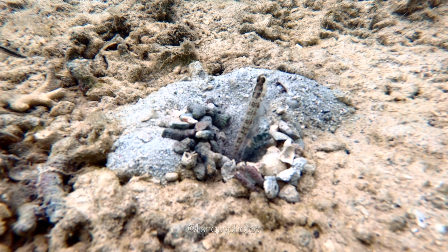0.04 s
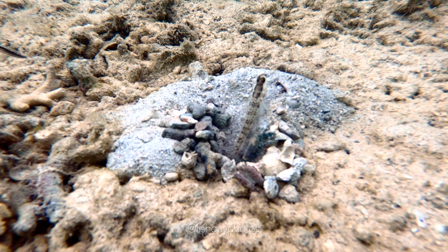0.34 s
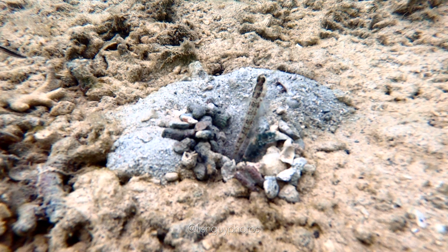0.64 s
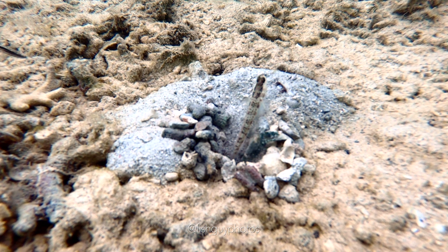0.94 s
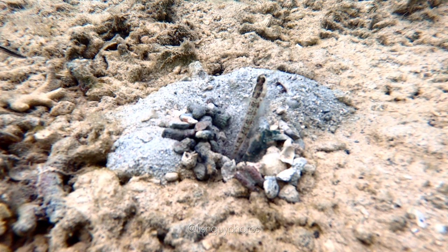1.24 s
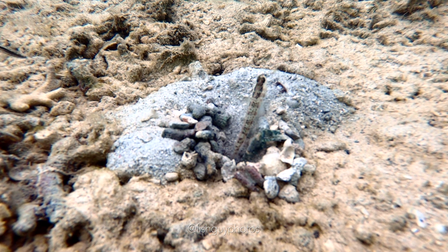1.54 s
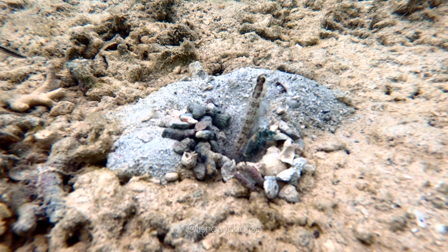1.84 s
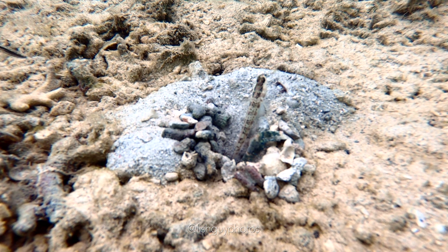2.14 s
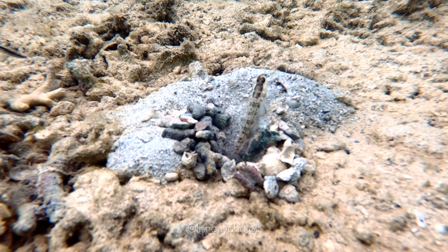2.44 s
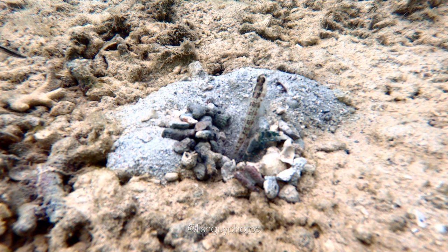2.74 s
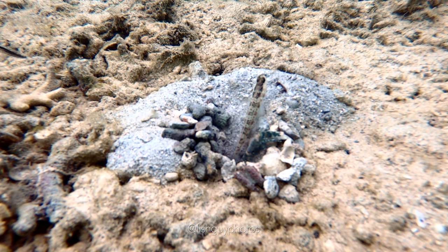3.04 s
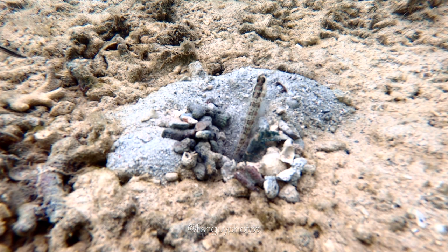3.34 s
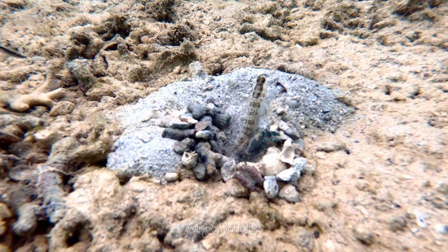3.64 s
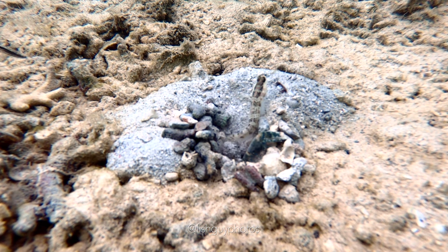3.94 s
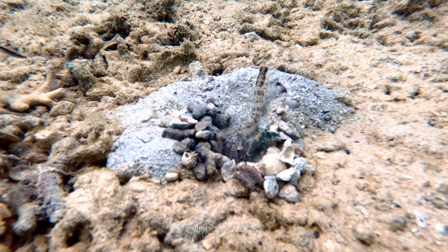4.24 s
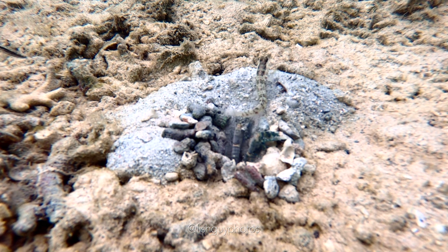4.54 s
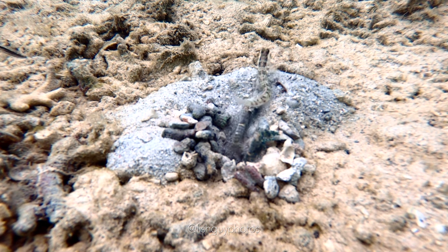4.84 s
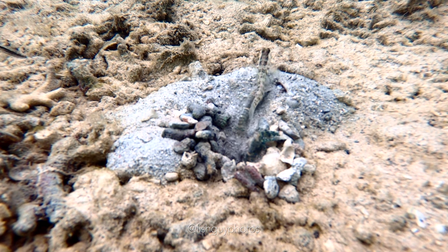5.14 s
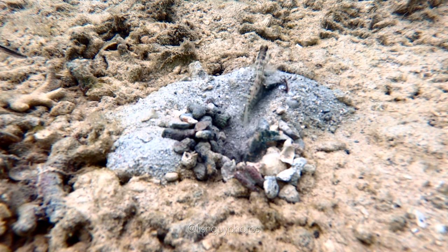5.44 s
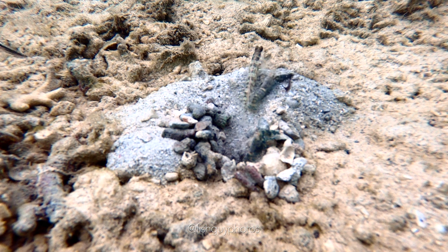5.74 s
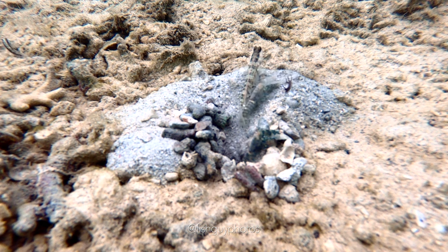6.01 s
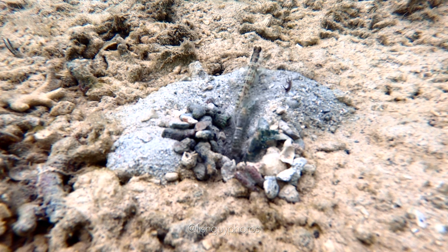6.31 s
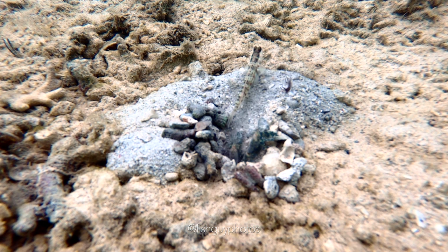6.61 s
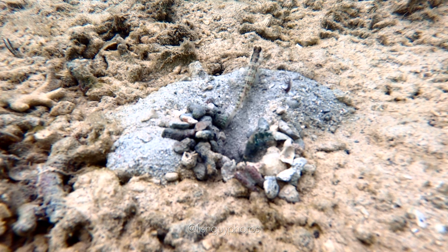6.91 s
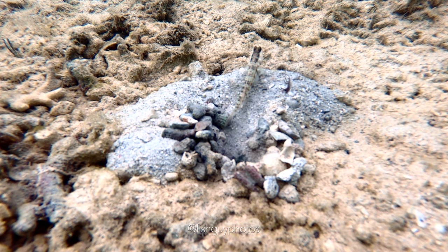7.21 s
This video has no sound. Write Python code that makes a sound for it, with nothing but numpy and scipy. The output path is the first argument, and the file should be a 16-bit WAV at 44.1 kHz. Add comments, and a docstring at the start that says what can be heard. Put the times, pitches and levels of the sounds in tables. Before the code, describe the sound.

Throughout the seven seconds or so, shrimp snap on a shallow reef: sharp, irregular clicks close by and a fine sizzle farther off, over a faint, steady low rumble. It is heard underwater from inside a watertight camera case, which adds a slight ring. Water sloshes gently against the case, and soft low thumps come and go, clustering in the first second and again between 4 and 4.7 seconds. A few tiny bubbles ping in the first half second and again between 3 and 4 seconds. Hard, hollow knocks on the case are the loudest events, at 0.6, 2.2 and 4.6 seconds, with a lighter one at 1 second. Gravel shifts with faint clicks around 3 seconds, followed by a quiet, dull nudge at 3.9. Gravel ticks again at about 6.3 and 6.9 seconds, and a second dull nudge comes at 7 as the crackling continues.

```python
"""A camera in a watertight case on a shallow reef flat. From the start shrimp snap near and far over a
faint rumble, the snaps ringing in the case's resonances, and water sloshes against it. From about 0.2 s
a few small bubbles ping and water thumps the case. Hard knocks strike it at 0.6, 1.0 and 2.2 s. Gravel
shifts around 3 s and a dull nudge follows at 3.9 s. The last knock lands at 4.6 s; gravel shifts again
after 6 s, and a second nudge comes at 7.0 s."""
import sys
import numpy as np
from scipy import signal
from scipy.fft import rfft, irfft, next_fast_len
from scipy.io import wavfile

SR = 44100
rng = np.random.default_rng(int(sys.argv[2]) if len(sys.argv) > 2 else 0)


def dump(signal):
    """Clip the signal to [-1, 1] and save it as 16-bit WAV at the path in sys.argv[1]."""
    limited = np.clip(np.atleast_2d(signal).T, -1, 1)
    pcm = np.round(limited * 32767).astype(np.int16)
    wavfile.write(sys.argv[1], SR, pcm)


N = 325017
TIME_S = np.arange(N) / SR
LEFT_LAG_S = 0.000095
MIC_LAG_S = np.array([[LEFT_LAG_S], [0]])
CRACK_BAND_HZ, EDGE_BAND_HZ = (3860, 5780), (7500, 14800)

# far reef spectrum, per microphone: f/Hz, relative density/dB
REEF_LEFT_SPECTRUM = [(500, -28.5), (850, -45), (1100, -7.5), (1350, -12.5), (1680, 2), (2100, -9),
                      (3200, -5), (4500, -15.5), (6200, -41), (7100, -7), (8300, -38), (12500, -21),
                      (15000, -46)]
REEF_RIGHT_SPECTRUM = [(500, -34), (880, -23), (1200, -11), (1700, -9.5), (2200, -15), (4000, -17.5),
                       (4900, -14), (6300, -13.5), (7200, -25.5), (8200, -34), (12500, -32), (15000, -42)]
# rumble spectrum: f/Hz, relative density/dB
RUMBLE_SPECTRUM = [(15, -10), (30, -3), (42, -6), (65, -15.5), (95, -26.5), (125, -16), (165, -4),
                   (260, -6.5), (380, -7.5), (600, -16), (900, -20.5)]
# surge of water round the case: t/s, relative level/dB
SLOSH_LEVELS = [(0.05, -70.5), (0.24, -49), (0.46, -60.5), (0.7, -54.5), (1.03, -53), (1.27, -72.5),
                (1.9, -52), (2.1, -62), (2.3, -50.5), (2.52, -66.5), (3.9, -61), (4.72, -60), (4.95, -67.5),
                (5.35, -62), (5.51, -47.5), (5.66, -61.5), (6.3, -66), (7.3, -60.5)]
# slosh spectrum: f/Hz, relative density/dB
SLOSH_SPECTRUM = [(100, -61), (150, -9), (200, -9.5), (270, -8.5), (350, 5), (430, -5), (510, 0.5),
                  (620, -14.5), (750, -32), (1100, -53)]
# nearest snaps: t/s, crack level/dB (10 ms rms), body re crack/dB, edge re crack/dB, body f/Hz
NEAR_SNAPS = [(0.244, -53, -1.5, -15, 2700), (0.382, -52, 2, -5.5, 2050), (0.5194, -42, -6, -23, 2150),
              (0.5755, -33, 1.5, -21.5, 2180), (0.7353, -39.5, -10, -27, 2220),
              (0.8034, -34, -8, -25.5, 2570), (0.8419, -33, 1, -26, 2420), (0.964, -46, 2, -21, 1800),
              (0.9919, -25.5, 0, -24.5, 1880), (1.0093, -43, -1, -17, 2300),
              (1.1709, -50.5, -16, -21, 2710), (1.2214, -52, 9.5, -32, 2200),
              (1.3795, -53.5, -3.5, -5.5, 2980), (1.5164, -51.5, 3, -23, 2140),
              (1.8286, -48.5, -3, -15, 2260), (1.8442, -48, -5, -15, 2250),
              (1.9088, -46.5, -1.5, -10, 2190), (2.0495, -33.5, -6, -26, 2840),
              (2.1707, -48, -1, -14.5, 3000), (2.1968, -47, -11, -17, 2760), (2.2352, -45, -2, -18, 2200),
              (2.3519, -52, -3, -19, 2330), (2.4195, -34.5, -8, -31, 2850), (2.4359, -50, 5, -23, 2870),
              (2.4488, -40, -6.5, -22.5, 2480), (2.704, -47.5, -4.5, -9, 2140),
              (2.7537, -46, -5, -17, 2000), (2.8264, -36, -6.5, -30, 2030), (3.0711, -51, 0.5, -10, 2810),
              (3.0988, -48.5, -5, -28, 1920), (3.3715, -62, 12.5, -27, 1930),
              (3.4648, -43, -4.5, -44, 2380), (3.6798, -47.5, 1.5, -16, 2350),
              (3.8113, -49, 2.5, -36, 2780), (3.8384, -41.5, -5.5, -18, 2080),
              (4.2749, -50.5, -6.5, -15, 2230), (4.3301, -38.5, -2.5, -20, 2210),
              (4.4062, -46.5, -3, -12, 2250), (4.4918, -48, 1.5, -15, 2740), (4.686, -47, -15, -23, 1890),
              (4.7324, -45.5, -6, -21, 2180), (4.8043, -35, -4.5, -48, 2000),
              (4.8799, -44, -7.5, -24, 1980), (5.3793, -37.5, -3.5, -23, 2100),
              (5.8324, -35.5, -1.5, -12, 2320), (5.9554, -42.5, -5, -16.5, 2010),
              (6.2914, -50.5, -2.5, -17, 2500), (6.4465, -43, -1, -18, 2100),
              (6.5361, -42, -8.5, -11.5, 2880), (6.735, -47, -7.5, -14, 2110),
              (6.7995, -44.5, -3.5, -11, 2220), (7.1685, -55.5, 9.5, -23, 1930),
              (7.2838, -51, 0, -9.5, 2570)]
# resonances that let water-borne sound into the case: f/Hz, width/Hz, left gain/dB, right gain/dB
CASE_MODES = [(355.3, 57, 12, 11), (487.5, 24.3, 14.5, 14), (573, 47, 17.5, 14), (1051, 53, 22, 21.5),
              (1204, 49, 10, 26.5), (1530, 165, 20.5, 13), (1820, 236, 17, 11.5), (2316, 320, 16.5, 13.5),
              (3073, 514, 17, 13), (3320, 280, 21, 17.5), (4190, 410, 10, -11), (4700, 400, 0.5, 22),
              (5070, 2360, 3, 15.5), (7070, 1160, 9.5, 13.5), (9680, 640, 2, -21),
              (12200, 1100, -8.5, -7.5)]
# small bubbles: t/s, relative level/dB, starting f/Hz
BUBBLES = [(0.155, -54.5, 1190), (0.2603, -50.5, 1710), (0.455, -51, 1544), (0.4953, -48.5, 1080),
           (3.0373, -40, 1696), (3.0978, -55, 1186), (3.756, -39.5, 1815), (5.596, -55.5, 1240)]
# water thumps on the case: t/s, relative peak level/dB
THUMPS = [(0.223, -41), (0.393, -39), (0.572, -39), (0.751, -33.5), (0.807, -38.5), (0.841, -37),
          (0.894, -33.5), (0.961, -37), (1.762, -42), (2.133, -44.5), (2.616, -46.5), (3.032, -44.5),
          (3.264, -43), (3.635, -42.5), (4.188, -37.5), (4.34, -33.5), (4.442, -33.5), (4.688, -38.5),
          (5.136, -43), (5.241, -41.5), (5.83, -42.5)]
# hard knocks on the case: t/s, level/dB (10 ms rms), contact low-pass f/Hz
KNOCKS = [(0.609, -20, 1440), (0.9917, -30, 5140), (2.2495, -20.5, 7800), (4.5786, -21.5, 6760)]
# modes of the struck wall: f/Hz, width/Hz, left gain/dB, right gain/dB
WALL_MODES = [(350.7, 38.4, 20, 19.5), (536.6, 61.4, 24.5, 22.5), (818, 91, 15, 2.5),
              (1068, 46.5, 21, 20.5), (1223, 60, -8, 26), (1500, 82, 26, 20), (1670, 170, 26.5, 17),
              (1844, 296, 18.5, 17), (2640, 85, 18.5, 16.5), (3480, 130, 25, 20), (3980, 510, -9, 6),
              (4500, 1190, -31, 3), (7500, 310, 13.5, 11), (9800, 260, -10.5, 5)]
# gravel shifts: peak t/s, level/dB, sigma/s
GRAVEL_SHIFTS = [(3.045, -46.5, 0.0099), (3.1, -61.5, 0.017), (3.8, -68, 0.12), (6.33, -58.5, 0.0072),
                 (6.905, -49.5, 0.0035)]
# dull nudges on the case: peak t/s, level/dB, sigma/s
NUDGES = [(3.88, -58, 0.016), (7.04, -52, 0.016)]
# nudge spectrum: f/Hz, relative density/dB
NUDGE_SPECTRUM = [(25, 7), (60, 3), (110, -10), (170, 5), (300, 8.5), (450, -3.5)]


def from_db(db):
    """Decibels to gain."""
    return 10 ** (np.asarray(db) / 20)


def unit_rms(x):
    """Scale to rms 1."""
    return x / np.sqrt(np.mean(x ** 2) + 1e-20)


def unit_burst(spectra):
    """Scale stereo burst spectra to the energy of 10 ms at rms 1."""
    return spectra / np.sqrt(np.mean(np.abs(spectra) ** 2, axis=(-2, -1), keepdims=True) / (SR / 100))


def add(out, at_s, sound):
    """Mix in a short stereo sound."""
    start = int(np.clip(round(at_s * SR), 0, N - 1))
    out[:, start:start + sound.shape[-1]] += sound[:, :N - start]


def drift(rate_hz, step=40, settle=2000):
    """Slow random wander, rms 1."""
    pole = np.exp(-2 * np.pi * rate_hz * step / SR)
    noise = rng.standard_normal(N // step + settle + 2)
    slow = signal.lfilter([1], [1, -2 * pole, pole * pole], noise)[settle:]
    return np.interp(np.arange(N) / step, np.arange(len(slow)), unit_rms(slow))


def swells(rows):
    """Gain curve, one Gaussian swell per row."""
    return sum(from_db(db) * np.exp(-((TIME_S - at_s) / sigma_s) ** 2 / 2) for at_s, db, sigma_s in rows)


def coloured(x, spectrum):
    """Filter by (f/Hz, level/dB) points, 12 dB/octave off past the ends; rms 1."""
    size = next_fast_len(N)
    hz, db = np.transpose(spectrum)
    grid_hz = np.fft.rfftfreq(size, 1 / SR) + 1
    gain = from_db(np.interp(np.log(grid_hz), np.log(hz), db))
    gain *= np.minimum(grid_hz / hz[0], 1) ** 2 * np.minimum(hz[-1] / grid_hz, 1) ** 2
    return unit_rms(irfft(rfft(x, size) * gain, size)[..., :N])


def stereo_noise(apart_db):
    """White noise common to both microphones, plus a part of their own."""
    return unit_rms(rng.standard_normal(N) + from_db(apart_db) * rng.standard_normal((2, N)))


def resonance(hz, centre_hz, width_hz):
    """Response of one damped mode, peak 1."""
    return 1j * hz * width_hz / (centre_hz ** 2 - hz ** 2 + 1j * hz * width_hz)


def band_response(hz, band_hz, order=3):
    """Butterworth band-pass response."""
    return signal.sosfreqz(signal.butter(order, band_hz, "band", fs=SR, output="sos"), hz, fs=SR)[1]


def modal_response(hz, modes):
    """Parallel modes of alternating sign at each microphone; the left lags."""
    response = sum((-1) ** k * from_db([[left_db], [right_db]]) * resonance(hz, centre_hz, width_hz)
                   for k, (centre_hz, width_hz, left_db, right_db) in enumerate(modes))
    return response * np.exp(-2j * np.pi * hz * MIC_LAG_S)


def far_reef(left_db=-69, right_db=-68, flicker_db=3.0):
    """Countless distant snaps merge into a fine sizzle."""
    left = from_db(left_db) * coloured(rng.standard_normal(N), REEF_LEFT_SPECTRUM)
    right = from_db(right_db) * coloured(rng.standard_normal(N), REEF_RIGHT_SPECTRUM)
    return np.array([left, right]) * from_db(flicker_db * drift(rate_hz=55))


def rumble(level_db=-66):
    """Faint, steady, wide low noise."""
    return from_db(level_db) * coloured(stereo_noise(apart_db=10.5), RUMBLE_SPECTRUM)


def slosh(gain_db=-1.5, lumps_db=4.5, pan_db=0.5):
    """Moving water drums unevenly on the case."""
    surge_db = np.interp(TIME_S, *np.transpose(SLOSH_LEVELS))
    flow = from_db(surge_db + gain_db + lumps_db * drift(rate_hz=20))
    return flow * coloured(stereo_noise(apart_db=-13.5), SLOSH_SPECTRUM) * from_db([[pan_db], [-pan_db]])


def colony(top_db=-52.0, falloff_db=16, body_db=-7, body_spread_db=3, edge_db=-15, edge_spread_db=4,
           body_hz=2450, spread_octaves=0.59, count=600):
    """Snap rows for shrimp spread evenly over the seabed: the farther, the more and the fainter."""
    activity = np.cumsum(from_db(3 * drift(rate_hz=4)))   # flurries and lulls
    at_s = np.interp(rng.random(count), activity / activity[-1], TIME_S)
    area = 1 + np.arange(count) / len(NEAR_SNAPS)   # seabed out to each shrimp; near patch = 1
    body, edge = rng.standard_normal((count, 2)).T
    return np.column_stack([at_s, top_db - falloff_db * np.log10(area),
                            body_db + body_spread_db * body, edge_db + edge_spread_db * edge,
                            body_hz * 2 ** (spread_octaves * rng.uniform(-1.2, 1, count))])


def snaps(rows, rise_s=0.0002, decay_s=0.0011, scatter_db=-21, scatter_s=0.009, apart_db=-6,
          body_width_ratio=0.54, lead_s=0.00018, near_db=-46, smear_per_db=0.025, size=1024):
    """A cavitation bubble collapses: a crack smeared by rubble, then scatter, all ringing in the case."""
    at_s, crack_db, body_db, edge_db, body_hz = np.transpose(rows)[..., None, None]
    t, hz = TIME_S[:size], np.fft.rfftfreq(size, 1 / SR)
    smear = np.exp(smear_per_db * np.maximum(near_db - crack_db, 0))   # far snaps arrive by more paths
    attack = 1 - np.exp(-(t / (rise_s * smear)) ** 2)
    decay = np.exp(-t / (decay_s * smear)) + from_db(scatter_db) * np.exp(-t / scatter_s)
    paths = rng.standard_normal((len(at_s), 3, size))   # common, left, right
    burst = (paths[:, :1] + from_db(apart_db) * paths[:, 1:]) * attack * decay
    inside = rfft(burst) * modal_response(hz, CASE_MODES)
    body = unit_burst(inside * resonance(hz, body_hz, body_width_ratio * body_hz) ** 2)
    crack = unit_burst(inside * band_response(hz, CRACK_BAND_HZ))
    edge = unit_burst(inside * band_response(hz, EDGE_BAND_HZ))
    sounds = irfft(from_db(crack_db) * (crack + from_db(body_db) * body + from_db(edge_db) * edge))
    out = np.zeros((2, N))
    for snap_s, sound in zip(at_s.ravel(), sounds):
        add(out, snap_s - lead_s, sound)
    return out


def bubbles(gain_db=3, ring_s=0.009, rise_s=0.00024, glide_per_s=2.6, size=3000):
    """Each freed bubble rings briefly, rising a little in pitch."""
    t, out = TIME_S[:size], np.zeros((2, N))
    envelope = (1 - np.exp(-t / rise_s)) * np.exp(-t / ring_s)
    for at_s, db, hz in BUBBLES:
        phase = 2 * np.pi * hz * (t + glide_per_s * t ** 2 / 2 - MIC_LAG_S)
        add(out, at_s, from_db(db + gain_db) * np.sin(phase) * envelope)
    return out


def thumps(gain_db=1.5, push_s=0.0068, band_hz=(150, 460), lead_s=0.003, size=4096):
    """Soft pushes of water reach only the lowest case modes."""
    t, hz = TIME_S[:size], np.fft.rfftfreq(size, 1 / SR)
    response = band_response(hz, band_hz, order=4) * modal_response(hz, CASE_MODES)
    out = np.zeros((2, N))
    for at_s, db in THUMPS:
        push = rng.standard_normal(size) * np.exp(-t / push_s)
        sound = irfft(rfft(push) * response)
        add(out, at_s - lead_s, from_db(db + gain_db) * sound / np.abs(sound).max())
    return out


def knocks(bend_hz=1100, stir_db=-25, stir_s=0.039, grit_db=-10, grit_s=0.003, size=8192):
    """A blunt, gritty blow drives the wall modes and leaves the water stirring."""
    t, hz = TIME_S[:size], np.fft.rfftfreq(size, 1 / SR)
    dispersion = ((bend_hz - 1j * hz) / (bend_hz + 1j * hz)) ** 2   # low bending waves arrive later
    out, stir = np.zeros((2, N)), np.zeros(N)
    for at_s, db, contact_hz in KNOCKS:
        contact = 1 / (1 + 1j * hz / contact_hz) ** 2
        wall = unit_burst(contact * dispersion * modal_response(hz, WALL_MODES))
        burst = rng.standard_normal(size) * np.exp(-t / grit_s)
        grit = unit_burst(contact * rfft(burst) * modal_response(hz, CASE_MODES))
        add(out, at_s, from_db(db) * irfft(wall + from_db(grit_db) * grit))
        stir += from_db(db + stir_db) * (TIME_S > at_s) * np.exp(-np.abs(TIME_S - at_s) / stir_s)
    water = coloured(rng.standard_normal(N), [(280, -2.5), (350, -23), (430, -21), (530, 12.5), (680, -9)])
    return out + stir * water


def gravel(grains_per_s=1500):
    """Bits of coral rub together in short runs of tiny clicks."""
    grains = rng.standard_normal(N) * (rng.random(N) < grains_per_s / SR)
    pair = np.array([np.interp(TIME_S - LEFT_LAG_S, TIME_S, grains), grains])
    clicks = coloured(pair, [(900, -16), (1200, 1.5), (1400, -1), (1750, 2.5), (2400, -4), (4000, -13)])
    return swells(GRAVEL_SHIFTS) * clicks


def nudges():
    """Dull nudges on the case: brief swells of low noise."""
    return swells(NUDGES) * coloured(stereo_noise(apart_db=-10), NUDGE_SPECTRUM)


def scene():
    """Shrimp crackle over water, knocks and gravel."""
    crackle = snaps(np.vstack([NEAR_SNAPS, colony()])) + far_reef()
    return crackle + rumble() + slosh() + bubbles() + thumps() + knocks() + gravel() + nudges()


def record(dry, cutoff_hz=16000):
    """Steep elliptic low-pass."""
    return signal.sosfilt(signal.ellip(10, 0.1, 80, cutoff_hz, fs=SR, output="sos"), dry)


dry = scene()
out = record(dry)
dump(out)
```